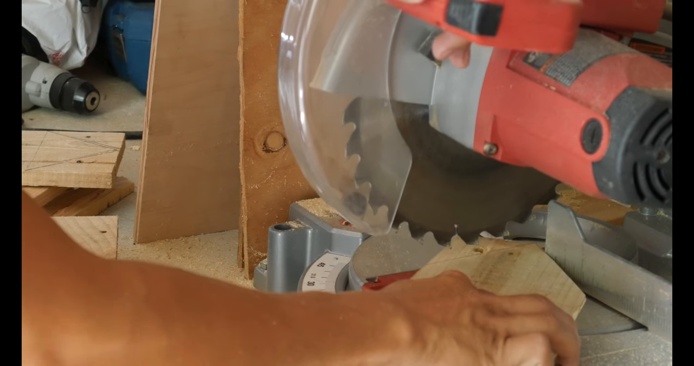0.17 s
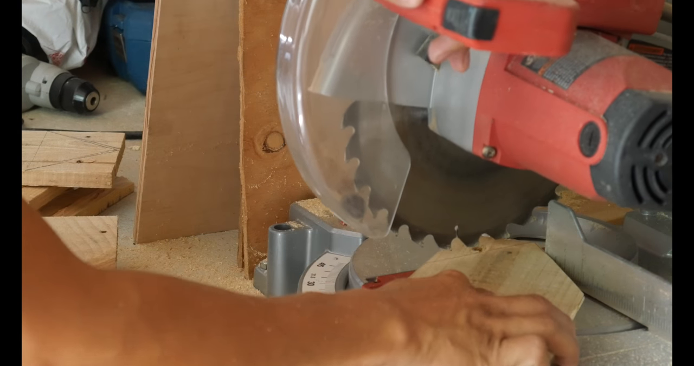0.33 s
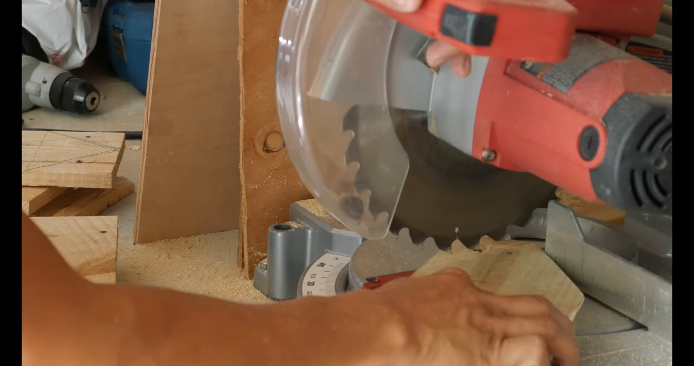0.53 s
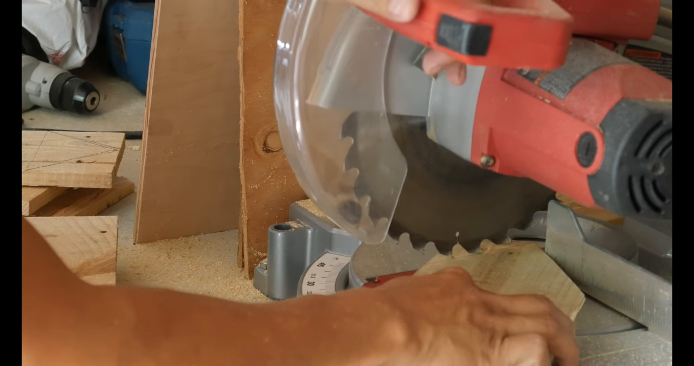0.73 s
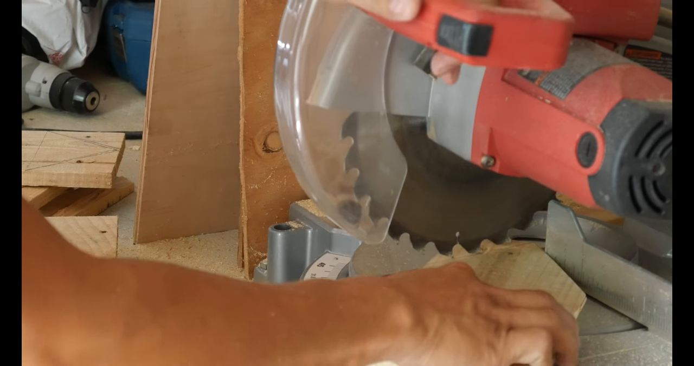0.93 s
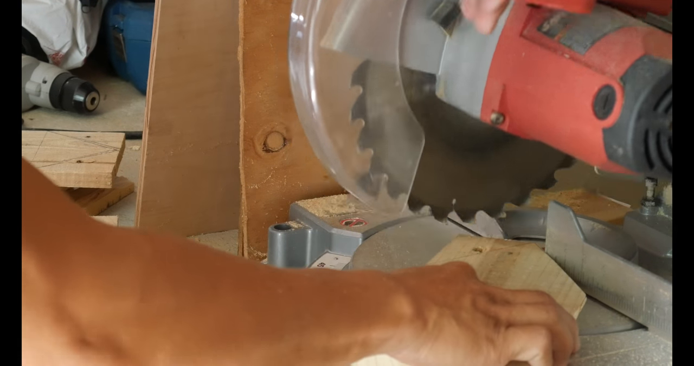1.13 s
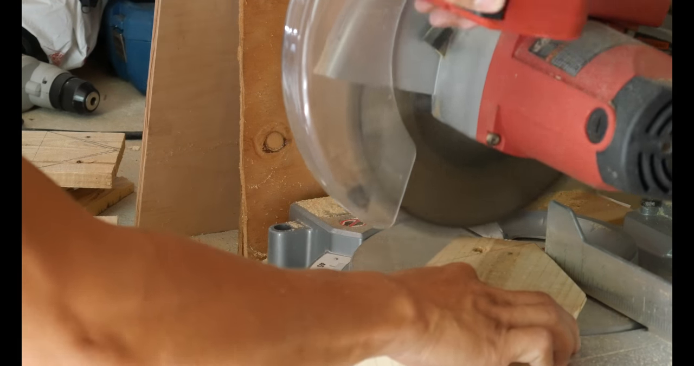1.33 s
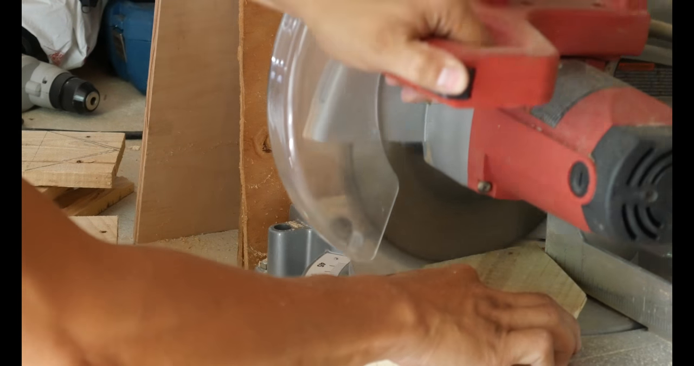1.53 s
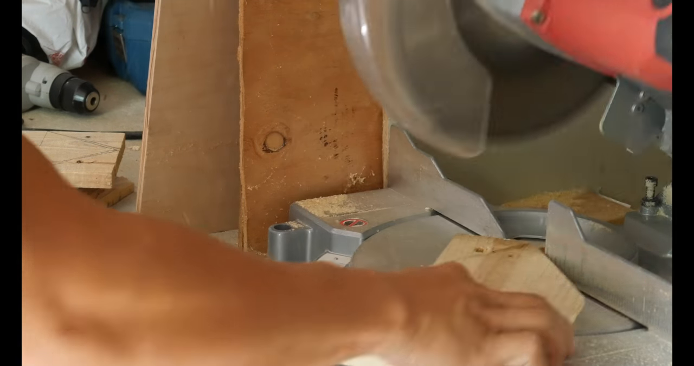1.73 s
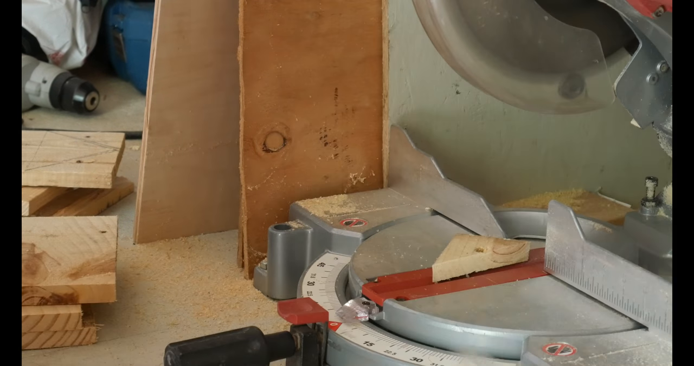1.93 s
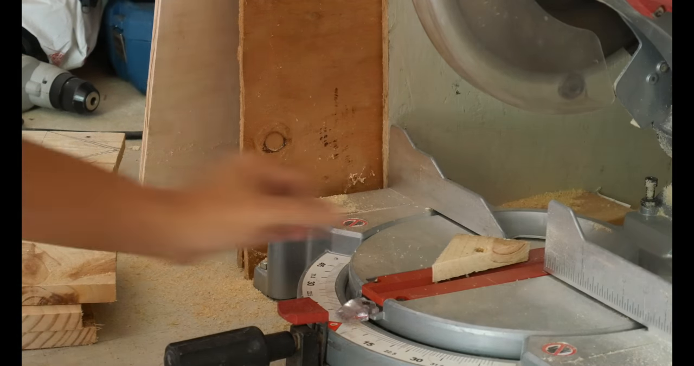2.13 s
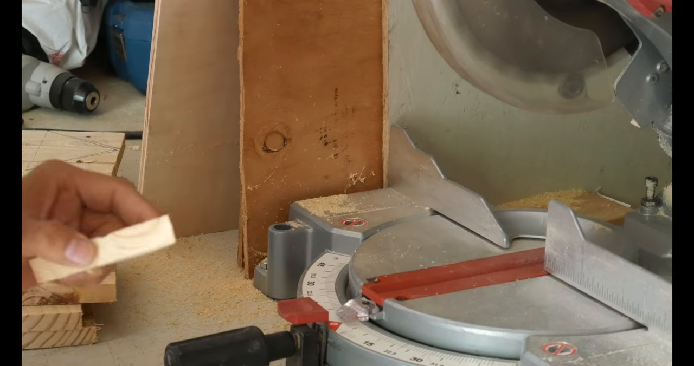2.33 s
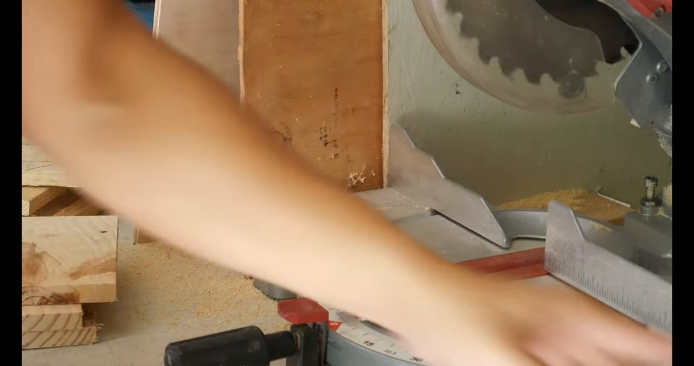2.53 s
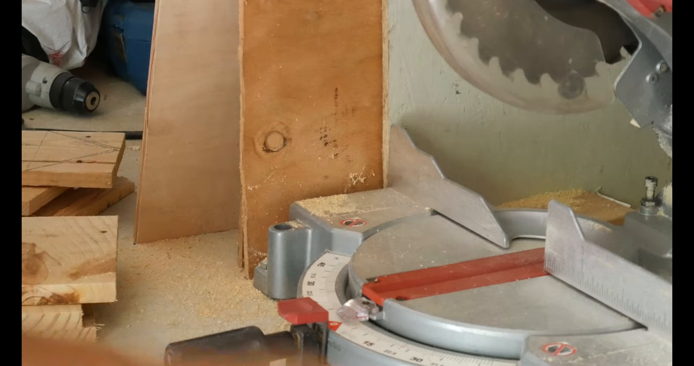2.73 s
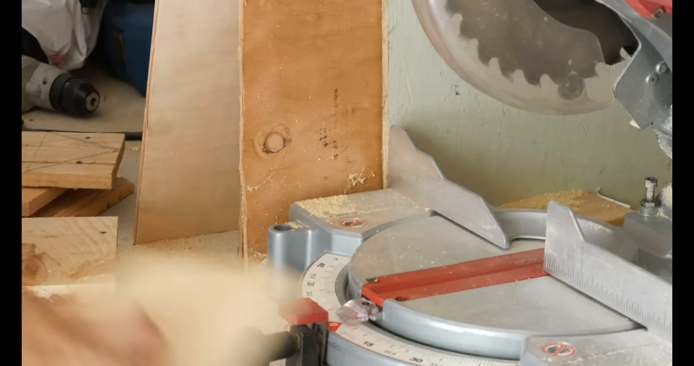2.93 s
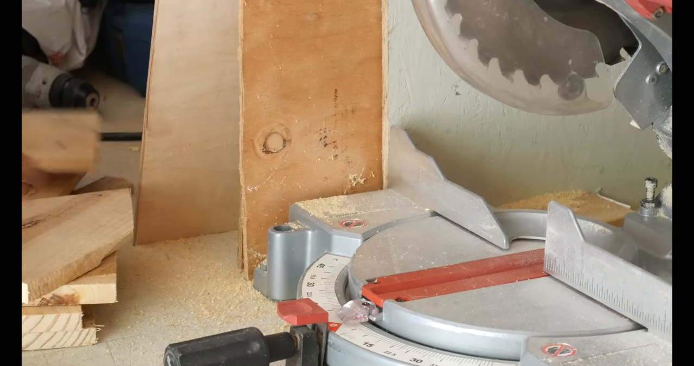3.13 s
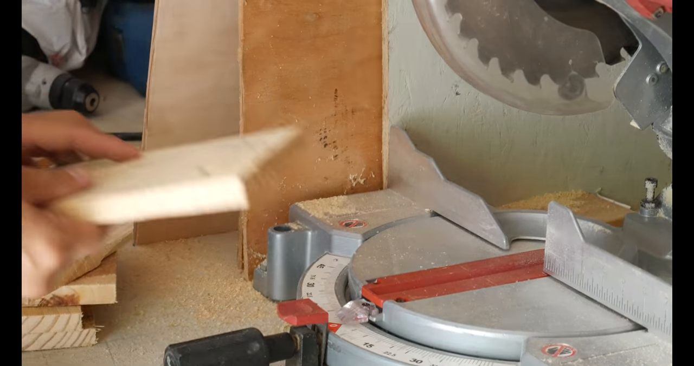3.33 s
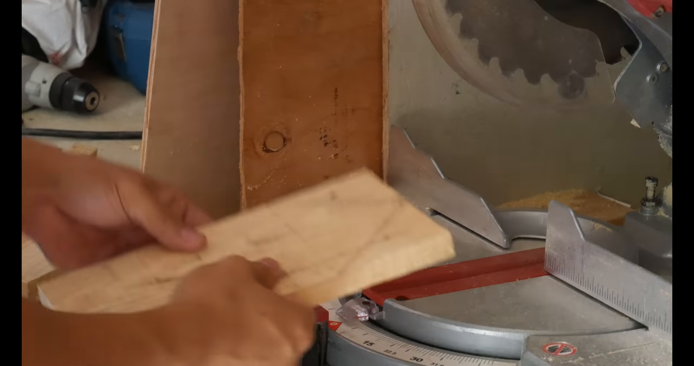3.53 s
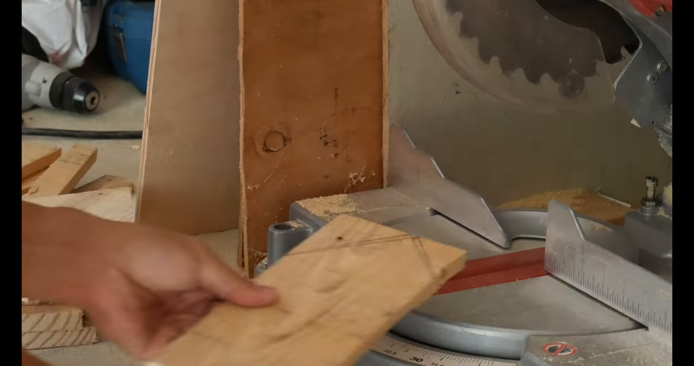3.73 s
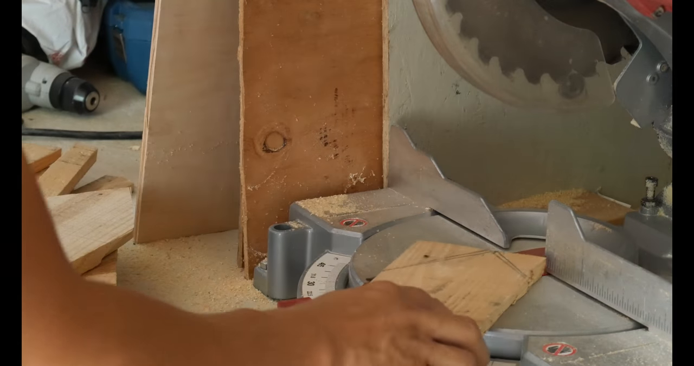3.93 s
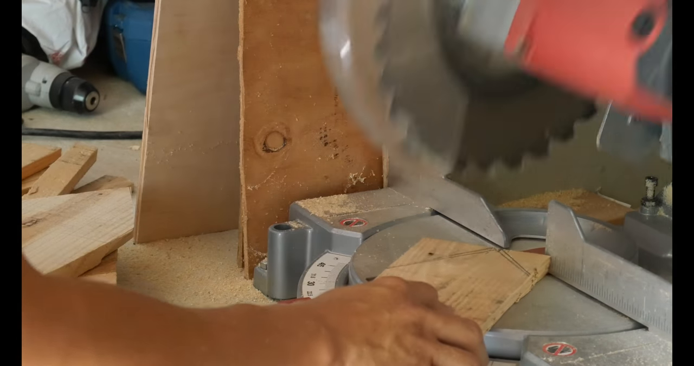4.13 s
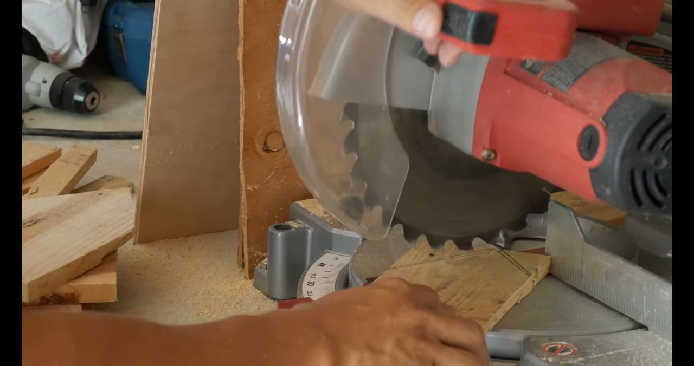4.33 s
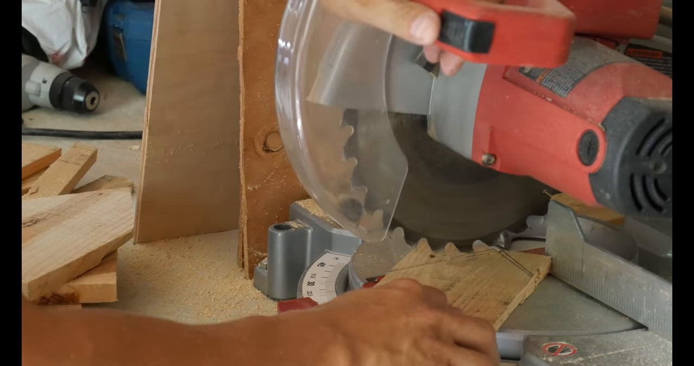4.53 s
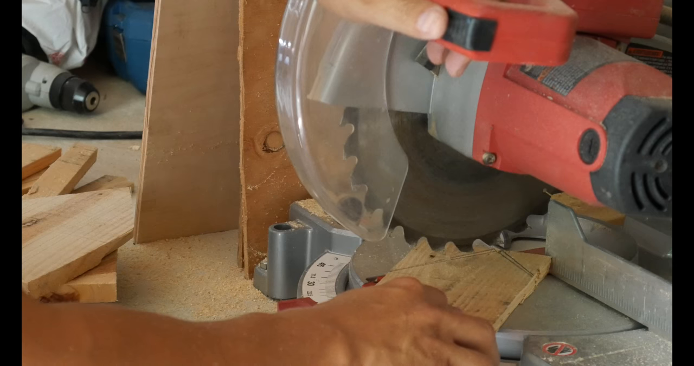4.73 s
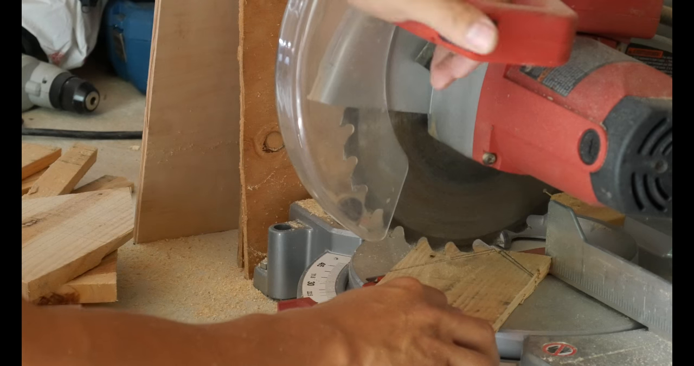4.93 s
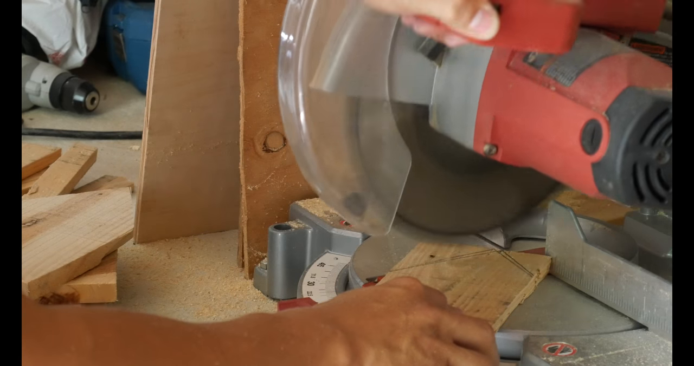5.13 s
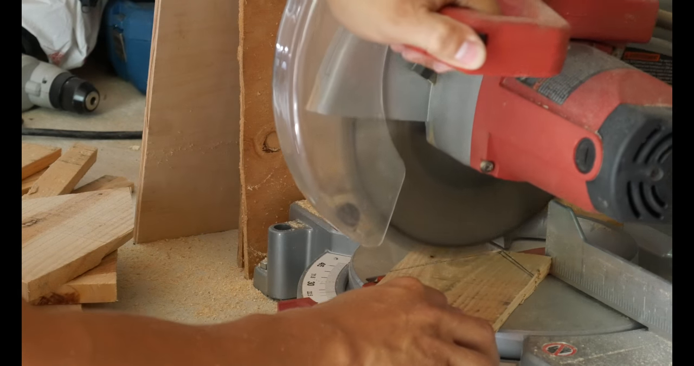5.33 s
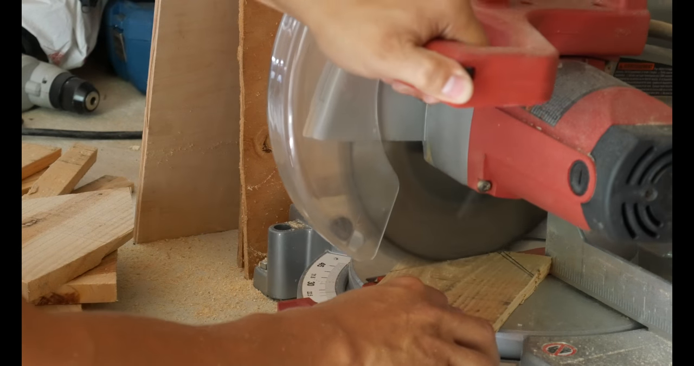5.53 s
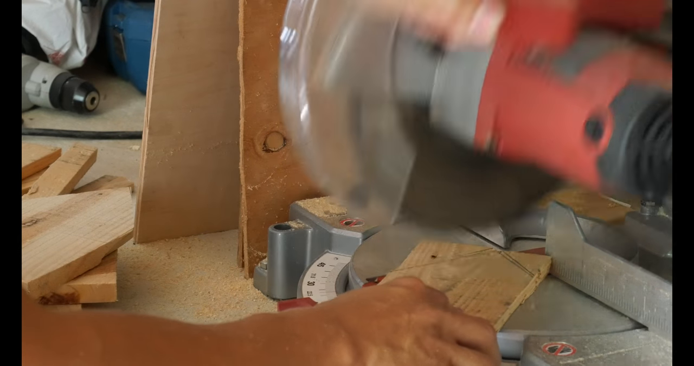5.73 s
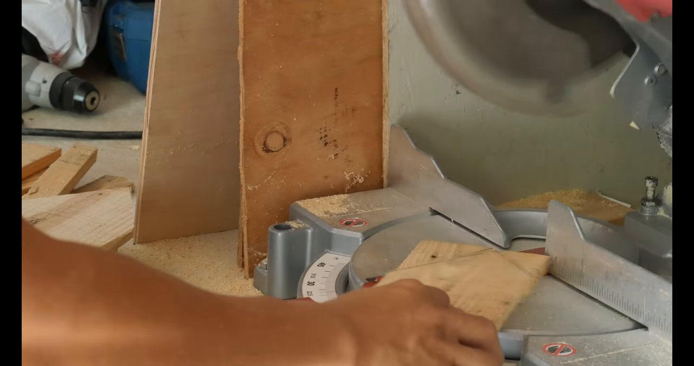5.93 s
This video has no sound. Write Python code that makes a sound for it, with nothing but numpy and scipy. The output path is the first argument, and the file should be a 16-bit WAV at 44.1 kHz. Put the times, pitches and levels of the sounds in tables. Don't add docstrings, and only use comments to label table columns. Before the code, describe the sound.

In a workshop, close up, a dull outdoor rumble and faint steel ringing precede an electric miter saw. It kicks in with a humming jolt, whines upward, bites through wood and brakes down quickly. Boards knock, scrape and rattle on the metal table, one blow squeaking. After a brief quiet, the saw starts again, cuts longer and begins braking as the sound ends.

```python
import sys
import numpy as np
from scipy import signal
from scipy.fft import rfft, irfft
from scipy.io import wavfile
from scipy.ndimage import uniform_filter1d

SR = 44100
rng = np.random.default_rng(int(sys.argv[2]) if len(sys.argv) > 2 else 0)


def persist_wave(psi):
    counts = np.round(np.clip(psi, -1, 1) * 32767).astype(np.int16)
    wavfile.write(sys.argv[1], SR, np.atleast_2d(counts).T)


def attenuation_scalar(level_db):
    decades = np.asarray(level_db, float) / 20
    return 10 ** decades


N = 268613
T = np.arange(N) / SR
HZ = np.maximum(np.fft.rfftfreq(N, 1 / SR), 1)


def unit(x):
    return x / np.sqrt(np.mean(x ** 2))


def colour(x, points, lo_hz=1, hi_hz=30000):
    hz, db = np.transpose(points)
    skirts = 1 / np.sqrt((1 + (lo_hz / HZ) ** 12) * (1 + (HZ / hi_hz) ** 12))
    gain = attenuation_scalar(np.interp(np.log(HZ), np.log(hz), db)) * skirts
    return irfft(rfft(x) * gain, N)


def ring(x, hz, width_hz):
    sharpness = max(hz / width_hz, .3)
    return signal.lfilter(*signal.iirpeak(min(hz, .45 * SR), sharpness, SR), x)


def walk(rate):
    k = int(SR / rate)
    held = np.repeat(rng.standard_normal(N // k + 1), k)
    slewed = uniform_filter1d(uniform_filter1d(held, k), k)
    return unit(slewed[:N])


def grains(count, spread_db):
    clicks = rng.standard_normal(count)
    size = np.minimum(rng.exponential(size=count), 4)
    return unit(clicks * attenuation_scalar(spread_db * size))


def play(table, fade_s):
    s, *columns = np.transpose(table)
    gate = np.clip(np.minimum(T - s[0], s[-1] - T) / fade_s + 1, 0, 1)
    return [np.interp(T, s, c) for c in columns], gate ** 2


def bump(start_s, peak_s):
    u = np.maximum(T - start_s, 0) / peak_s
    return u * np.exp(1 - u)


# time_s, level_db
RUMBLE = [(0, -54), (.7, -52.5), (1.0, -53), (1.2, -48.5), (2.55, -51.5), (2.68, -60.5), (2.8, -56),
          (3.06, -52), (3.25, -54), (3.57, -58), (3.85, -55), (4.02, -49), (4.25, -53.5), (4.56, -58.5),
          (4.9, -57), (5.06, -54.5)]
# frequency_hz, density_db per Hz
OUTSIDE = [(24, -46), (40, -16), (133, -1), (175, -9), (248, -4), (352, -4.5), (500, -7.5), (867, -7),
           (2080, -18), (3520, -22.5), (4090, -29.5), (15800, -52.5)]


def rumble():
    (low_db,), _ = play(RUMBLE, 1)
    low = unit(colour(rng.standard_normal(N), OUTSIDE, hi_hz=1500))
    low = low * attenuation_scalar(low_db + 1.2 * walk(14))
    high = unit(colour(rng.standard_normal(N), OUTSIDE, lo_hz=1500))
    high = high * attenuation_scalar(low_db - 14.5 + 1.0 * walk(17))
    hiss = attenuation_scalar(-80) * unit(ring(rng.standard_normal(N), 8250, 12000))
    draught = unit(ring(ring(rng.standard_normal(N), 90, 90), 90, 90))
    return low + high + hiss + attenuation_scalar(-78.5 + 3.0 * walk(4.7)) * draught


STEEL_MODES = 866.7, 1190, 1513, 4310, 1800, 1998, 3945, 2318, 1335
# start_s, end_s, level_db, fade_db_per_s
STEEL_SPELLS = [
    [(0, .125, -49.5, 1.5), (.26, .54, -53.5, 8.9)],
    [(0.0036, .11, -57, 80)],
    [(0.013, .11, -64, 80)],
    [(1.59, 1.62, -39, 4), (1.64, 1.71, -32, -20), (1.73, 1.8, -34, 90)],
    [(2.0, 2.48, -61, 5), (2.53, 2.6, -53, 6), (2.71, 2.865, -60, -8), (3.05, 3.1, -62, 5),
     (3.23, 3.77, -66.5, 31)],
    [(1.92, 2.45, -57.5, 2.9), (2.53, 2.59, -46, 49), (2.71, 2.86, -57.5, 15)],
    [(1.94, 2.34, -42, 42), (2.4, 2.59, -61, -8), (2.72, 2.85, -66, 25)],
    [(5.15, 5.715, -40.5, -15.5)],
    [(5.31, 5.834, -40, 6.9)],
]


def steel():
    out = 0
    for hz, spells in zip(STEEL_MODES, STEEL_SPELLS):
        phase = 2 * np.pi * hz * np.cumsum(1 + .002 * walk(25)) / SR
        tone = attenuation_scalar(1.5 * walk(12)) * np.sin(phase)
        for start_s, end_s, db, fade_db in spells:
            end_db = db - fade_db * (end_s - start_s)
            (level_db,), gate = play([(start_s, db), (end_s, end_db)], 0.01)
            out = out + gate * np.sqrt(2) * attenuation_scalar(level_db) * tone
    return out


# start_s, rise_s, level_db, pitch_hz
THUDS = [
    (.71, .015, -52.5, 248),
    (2.87, 0.036, -46.5, 153),
    (3.12, 0.015, -45, 295.8),
    (3.915, 0.025, -41.5, 125),
    (4.87, 0.057, -59, 112),
    (1.861, .04, -52, 69.83),
    (5.93, .04, -53, 75.5),
]


def thuds():
    noise = rng.standard_normal(N)
    out = 0
    for start_s, rise_s, db, hz in THUDS:
        boom = noise
        for _ in range(4):
            boom = ring(boom, hz, .6 * hz)
        out = out + attenuation_scalar(db) * bump(start_s, rise_s) * unit(boom)
    return out


SWITCH_S = .012
# time_s, mesh_hz
SPEED = [
    [(1.22, 950), (1.36, 1330), (1.44, 1605), (1.48, 1720), (1.52, 1780), (1.64, 1585), (1.67, 1700),
     (1.76, 1860), (1.81, 1800)],
    [(5.08, 950), (5.2, 1350), (5.3, 1615), (5.36, 1740), (5.4, 1775), (5.6, 1590), (5.72, 1500),
     (5.79, 1750), (5.885, 1800)],
]
# time_after_grip_s, speed_share
BRAKE = [(0, 1), (.04, .87), (.09, .6), (.13, .46), (.24, .29), (.44, .145), (.79, .05)]
# time_s, level_db
BITES = [
    [(1.5, -41.5), (1.56, -28.5), (1.645, -38.5)],
    [(5.36, -41), (5.5, -36.5), (5.715, -40.5)],
]
# time_s, level_db
EFFORT = [
    [(1.232, 1.7), (1.4, 4.5), (1.55, -0.6), (1.8, 0.5), (1.95, -1.9), (2.05, -4.6), (2.12, -10),
     (2.5, -4.5), (2.6, -31)],
    [(5.092, .1), (5.25, 4), (5.45, 0.8), (5.7, 1.15), (5.87, -0.35), (6.03, -5.3), (6.09, -5.5)],
]


def motor():
    points, cutting, braking = [], 0, 0
    for run, bite, effort in zip(SPEED, BITES, EFFORT):
        grip_s, hz = run[-1]
        points += run[:-1] + [(grip_s + s, hz * share) for s, share in BRAKE]
        cutting = cutting + play(bite, .03)[1]
        grip = np.clip((T - grip_s) / .05 + .5, 0, 1)
        braking = braking + grip * (T < effort[-1][0] + SWITCH_S)
    return np.interp(T, *np.transpose(points)), cutting, braking


# frequency_hz, width_hz, level_db
BLADE = [(4990, 120, -10.5), (5500, 25, -21.5), (5760, 24, -4), (6260, 53, -7), (6845, 56, -3),
         (7900, 55, -6), (9200, 240, -9.5), (10900, 45, -6.5), (11800, 42, -18)]


def blade(rattle):
    return sum(attenuation_scalar(db + 4.0 * walk(14)) * ring(rattle, hz, 1.5 * w) for hz, w, db in BLADE)


# frequency_hz, density_db per Hz
SAW = [(82, -25.5), (140, -8), (161, -23), (274, -16), (328, -10), (766, -3), (1940, -8.5), (2320, 5),
       (11000, -16.5), (15800, -26.5)]
# frequency_hz, width_hz, level_db
CASTING = [(842, 150, -3.5), (1312, 16, 0.5), (1590, 22, -35), (2300, 57, -10), (3083, 64, -1.5)]
# mesh_multiple, level_db against the noise around it
PARTS = [(7.6, -27), (9.1, -27), (13.3, -26)]


def gear_rattle(rattle, sing, turn):
    body = rattle + sum(attenuation_scalar(db + 3.5 * walk(22)) * ring(rattle, hz, w) for hz, w, db in CASTING)
    parts = sum(attenuation_scalar(db + 4.0 * walk(17)) * np.sin(k * turn) for k, db in PARTS)
    housing = unit(colour(body + parts, SAW, 140, 1700)) * attenuation_scalar(2.1 * walk(32))
    guard = unit(colour(body + parts, SAW, 1700, 4600)) * attenuation_scalar(1.9 * walk(32))
    air = unit(colour(rattle + attenuation_scalar(4.5) * sing + parts, SAW, 4600, 15900)) * attenuation_scalar(1.5 * walk(32))
    return housing, guard, air


WHINE_ORDERS = 1, 2, 3, 10.4, 5.2, 7.6, 13.3, 6.3, 9.1, 16.4
# free_db, in_wood_db, braking_db
WHINE_DB = [(-57, -42, -72), (-44.5, -45, -68), (-60, -46, -53.5), (-66, -69, -73), (-72, -72, -62),
            (-80, -80, -70), (-95, -95, -74), (-80, -80, -69), (-85, -85, -72), (-95, -95, -76)]
# frequency_hz, width_hz, gain_db
WHINE_PEAKS = [(3200, 200, 12), (3620, 260, 9), (4700, 300, 7), (14500, 1200, 4)]
BRAKE_PEAK = 2500, 500, 17


def gear_whine(speed, turn, cutting, braking):
    brake_hz, brake_width_hz, brake_gain_db = BRAKE_PEAK
    whine = 0
    for k, (free_db, cut_db, brake_db) in zip(WHINE_ORDERS, WHINE_DB):
        db = free_db + (cut_db - free_db) * cutting + (brake_db - free_db) * braking
        db = db + sum(g * np.exp(-((k * speed - hz) / w) ** 2) for hz, w, g in WHINE_PEAKS)
        db = db + braking * brake_gain_db * np.exp(-((k * speed - brake_hz) / brake_width_hz) ** 2)
        whine = whine + attenuation_scalar(db + 4.2 * walk(50)) * np.sin(k * turn)
    return whine


def chips(sing):
    crackle = grains(N, spread_db=-0.5) + attenuation_scalar(9.5) * sing
    crackle = unit(ring(ring(crackle, 7000, 16000), 7000, 16000))
    out = 0
    for table in BITES:
        (db,), gate = play(table, 0.0055)
        out = out + gate * attenuation_scalar(db) * crackle
    return out


# level_db at full speed, speed_power, surge_db added by a current surge
LAYERS = [
    (-31, 0.86, 12),
    (-29.5, 1.095, 0),
    (-40, 1.36, 1),
]
ARMATURE = .165, -17.5


def saw():
    full_hz = 1750
    surge_s, brake_surge, brake_surge_s = 0.069, 0.51, 0.091
    hum_db, hum_surge_db, hum_cut_db = -56, 27, 6.5
    hum_surge_s, hum_brake = 0.044, .3
    armature_order, armature_db = ARMATURE
    rattle = grains(N, spread_db=3.5)
    sing = blade(rattle)
    speed, cutting, braking = motor()
    turn = 2 * np.pi * np.cumsum(speed * (1 + 0.00816 * walk(90))) / SR
    regions = gear_rattle(rattle, sing, turn)
    whine = gear_whine(speed, turn, cutting, braking)
    hum = attenuation_scalar(1.2 * walk(14)) * np.sin(2 * np.pi * 119.9 * T)
    shake = 1 + 0.027 * hum
    share = speed / full_hz
    armature = attenuation_scalar(armature_db) * share ** 4 * np.sin(armature_order * turn)
    out = 0
    for table, run in zip(EFFORT, SPEED):
        (effort_db,), gate = play(table, SWITCH_S)
        on_s, grip_s = table[0][0], run[-1][0]
        surge = np.exp(-np.maximum(T - on_s, 0) / surge_s) + brake_surge * bump(grip_s, brake_surge_s)
        gains = [attenuation_scalar(db + surge_db * surge) * share ** power for db, power, surge_db in LAYERS]
        pull = bump(on_s, hum_surge_s) + hum_brake * bump(grip_s, hum_surge_s)
        lines = whine + attenuation_scalar(hum_db + hum_surge_db * pull + hum_cut_db * cutting) * hum
        lines = lines + gains[0] * armature
        noise = shake * sum(g * r for g, r in zip(gains, regions))
        out = out + gate * attenuation_scalar(effort_db) * (noise + np.sqrt(2) * lines)
    return out + chips(sing)


# middle_s, length_s, level_db, centre_hz
RATTLES = [(2.088, 0.059, -32, 750), (2.651, 0.016, -32, 685), (2.863, 0.019, -35.5, 467),
           (2.887, 0.048, -35, 786), (2.915, .038, -34, 654), (2.967, 0.049, -36, 800),
           (3.133, 0.062, -32, 884), (3.189, 0.1, -50.5, 700), (3.442, 0.052, -54.5, 700),
           (3.794, .025, -24, 530), (3.834, .083, -34.5, 780), (3.93, .054, -26, 685),
           (4.154, .045, -37.5, 1500), (4.438, 0.054, -55, 396), (6.033, .042, -29, 1023)]
# middle_s, length_s, level_db, centre_hz
SCRAPES = [(1.958, 0.031, -32.5, 2440), (2.177, 0.057, -39, 2050), (2.293, 0.021, -56, 3000),
           (2.507, .04, -52, 903), (2.6, 0.045, -51, 1500), (2.628, 0.029, -28, 1500),
           (2.672, .025, -44, 890), (3.027, 0.082, -46.5, 2300), (3.347, 0.15, -64, 2470),
           (3.988, 0.097, -61.5, 1500), (4.45, 0.23, -71, 2500), (4.936, 0.23, -66, 2500),
           (5.018, 0.038, -56.5, 1500)]
# middle_s, length_s, level_db, centre_hz
GRITTY = [
    (2.425, .044, -44.5, 2330),
    (2.48, .1, -41, 1970),
    (3.532, 0.059, -57, 2590),
    (4.071, .035, -41.5, 891),
    (4.115, .031, -57.5, 2470),
    (4.214, 0.068, -44, 990),
]
# middle_s, length_s, level_db, centre_hz
SQUEAKS = [
    (3.603, 0.043, -62.5, 3050),
    (3.72, 0.05, -57, 2735),
    (3.819, 0.06, -37.5, 2710),
    (4.295, 0.055, -55.5, 1020),
    (4.661, .063, -60, 3370),
    (4.89, 0.049, -54, 900),
]
# middle_s, length_s, level_db, centre_hz
SPRING = [
    (2.476, 0.14, -62, 13500),
]
# events, width over centre, grit_db
RUBS = [
    (RATTLES, 1.61, -40),
    (SCRAPES, 1.74, -10),
    (GRITTY, 1.66, 3.5),
    (SQUEAKS, 0.43, -30),
    (SPRING, .02, -47),
]


def scrapes():
    out = np.zeros(N + SR)
    for events, breadth, grit_db in RUBS:
        for s, length, db, hz in events:
            count, width_hz = int(length * SR), breadth * hz
            rub = grains(SR // 4, spread_db=5.5)[:count]
            wood = ring(ring(rub, hz, 0.9 * width_hz), hz, 0.9 * width_hz)
            wood = unit(ring(wood, hz, 6.0 * width_hz))
            table = attenuation_scalar(4.5) * ring(ring(rub, 2420, 640), 2420, 640) * (hz < 2000)
            grit = attenuation_scalar(grit_db - 15.5) * ring(ring(rub, 6500, 9000), 5100, 12000)
            swell = np.sin(np.pi * np.linspace(0, 1, count) ** 0.75) ** 2
            out[int(s * SR) - count // 2:][:count] += attenuation_scalar(db) * swell * (wood + table + grit)
    return out[:N]


# start_s, peak_db, pitch_hz, crack_db above 3 kHz, decay_t60_s
KNOCKS = [(2.072, -14, 383, -38, 0.066), (2.081, -10.5, 577, -30, 0.029), (2.09, -11, 1150, -36, 0.019),
          (2.484, -21.5, 634, -9.5, 0.043), (2.605, -31, 1065, -6, 0.047), (2.616, -13, 641, -36, 0.037),
          (2.637, -18.5, 1404, -13.5, 0.048), (2.877, -23.5, 1235, -8, 0.1), (2.897, -24, 560, -21, 0.04),
          (2.908, -6.5, 684, -31, 0.01), (3.116, -9.5, 1088, -44, 0.021), (3.125, -12, 890, -30, 0.014),
          (3.582, -49.5, 484, 4, 0.026), (3.789, -13.5, 417, -24, 0.02), (3.804, -4, 385, -30.5, 0.034),
          (3.818, -14.5, 460, -30, 0.098), (3.839, -13, 826, -41, 0.0097), (3.915, -25, 1040, -20, 0.054),
          (3.929, -25, 965, -50, 0.038), (4.145, -17, 1060, -7, 0.012), (5.008, -35, 820, -18, 0.04)]
# pitch_ratio, level_db, share of t60
BOARD = [(.55, -4.5, 1), (.8, -3.5, 1.28), (1.05, 7, 0.74), (1.45, -15, 0.66), (1.9, -1.5, 0.99),
         (2.6, 13, 0.26), (3.6, -4, 0.61)]


def knocks():
    out, t = np.zeros(N + SR), np.arange(SR // 5) / SR
    push = 1 - np.exp(-(t / 0.0034) ** 2)
    for s, db, hz, crack_db, t60 in KNOCKS:
        detune = 1 + 0.107 * rng.standard_normal(len(BOARD))
        modes = 0
        for (ratio, mode_db, share), d in zip(BOARD, detune):
            decay = attenuation_scalar(mode_db - 60 * t / (t60 * share))
            modes = modes + decay * np.sin(2 * np.pi * hz * ratio * d * t)
        modes = push * modes
        crack = rng.standard_normal(len(t)) * attenuation_scalar(-60 * t / 0.02)
        crack = ring(ring(crack, 4500, 9000), 4500, 9000)
        blow = modes / np.abs(modes).max() + attenuation_scalar(crack_db) * crack / np.abs(crack).max()
        out[int(s * SR):][:len(t)] += attenuation_scalar(db - 6.5) * blow
    return out[:N]


def duck(hits):
    knee_db, recovery_s = -29.5, 0.12
    keep = np.exp(-1 / (recovery_s * SR))
    loudness = signal.lfilter([1 - keep], [1, -keep], np.abs(hits))
    return 1 / (1 + loudness / attenuation_scalar(knee_db))


# frequency_hz, side_minus_mid_db
SIDE = [(30, -4.5), (100, -30), (2000, -32), (5000, -24), (8000, -15.5), (16000, -19)]


def scene():
    bass_cut = signal.butter(3, 200, "high", fs=SR, output="sos")
    hits = signal.sosfilt(bass_cut, knocks() + scrapes())
    t = np.arange(SR // 3) / SR
    tail = unit(ring(rng.standard_normal(len(t)), 500, 2300) * attenuation_scalar(-60 * t / 0.06))
    room = attenuation_scalar(-57.5) * signal.fftconvolve(hits, tail)[:N]
    background = duck(hits) * (rumble() + steel())
    mid = background + thuds() + saw() + hits + room
    count = 2500
    smear = rng.standard_normal(count) / np.sqrt(count)
    side = colour(signal.fftconvolve(mid, smear)[:N], SIDE)
    return np.array([mid + side, mid - side])


def top_cut(x):
    return signal.sosfilt(signal.butter(12, 15920, fs=SR, output="sos"), x)


def record(dry):
    rounded = np.tanh(2.445 * dry) / 2.377
    top = signal.ellip(10, .2, 70, 15450, fs=SR, output="sos")
    mix = signal.sosfilt(top, rounded)
    return top_cut(mix)


dry = scene()
out = record(dry)
persist_wave(out)
```